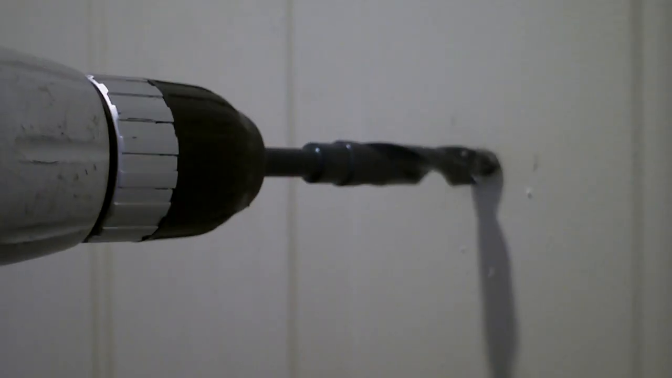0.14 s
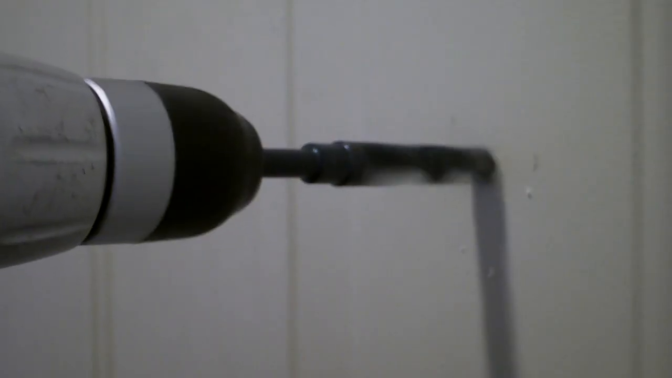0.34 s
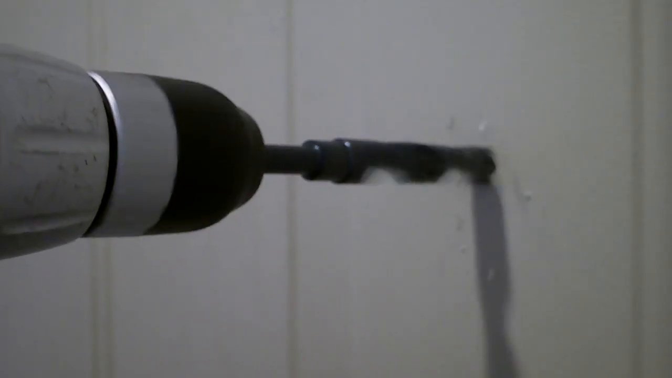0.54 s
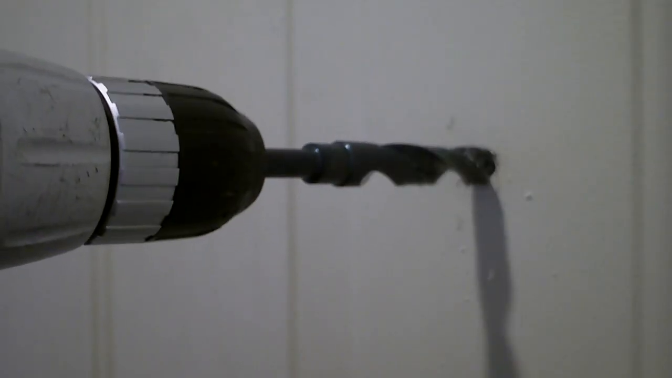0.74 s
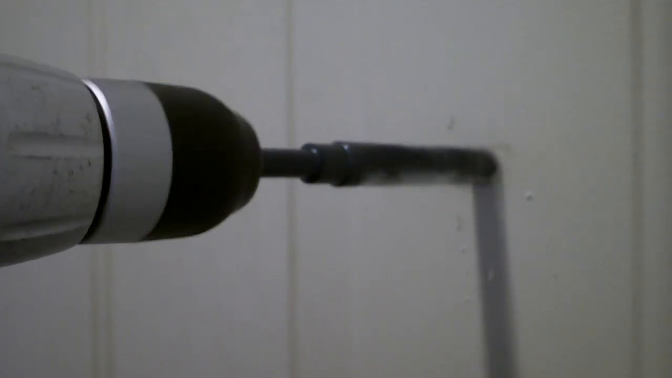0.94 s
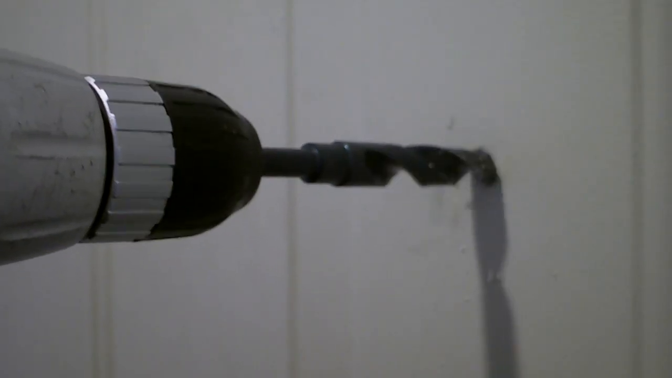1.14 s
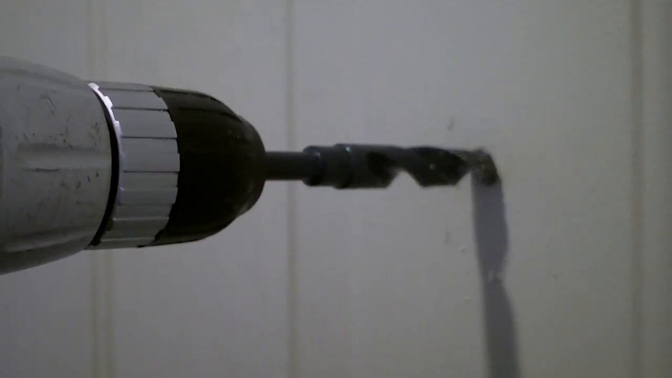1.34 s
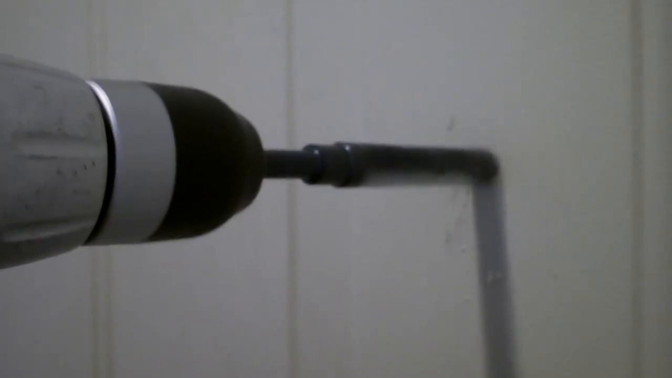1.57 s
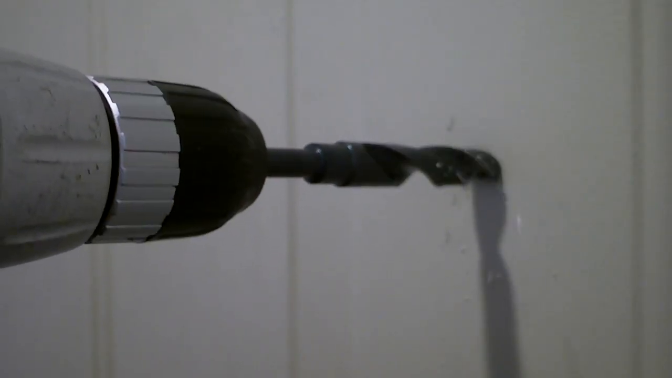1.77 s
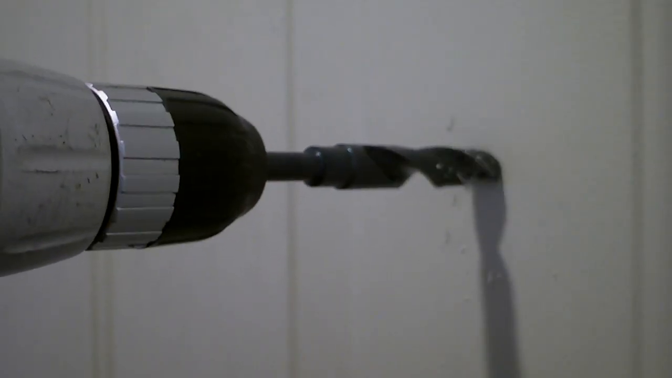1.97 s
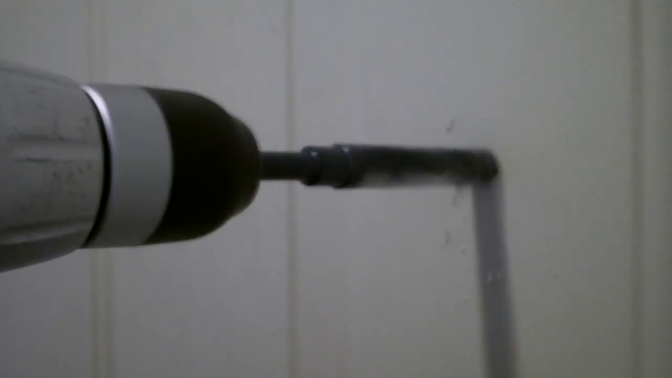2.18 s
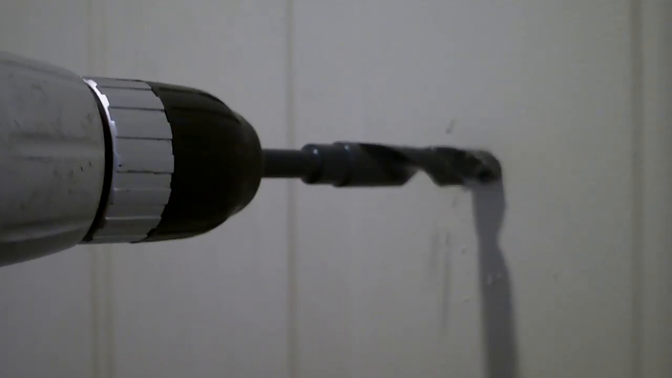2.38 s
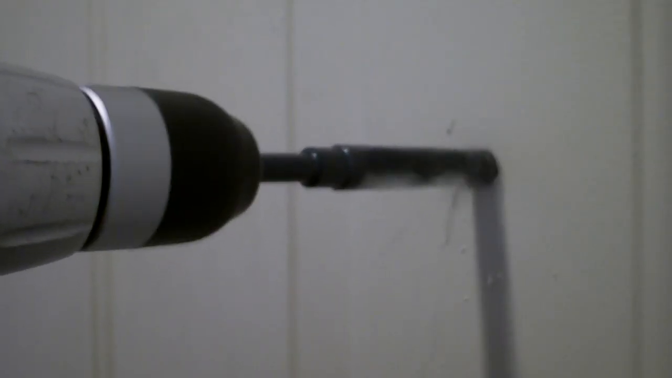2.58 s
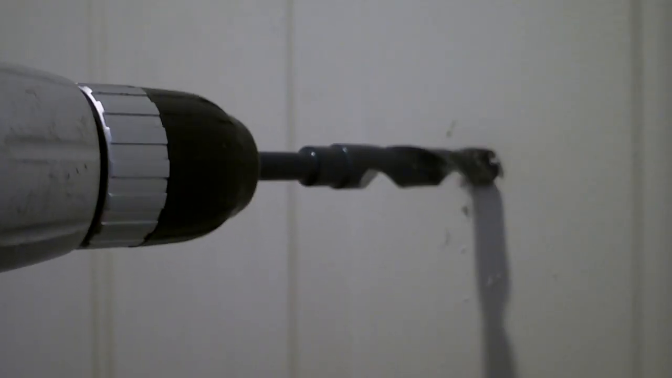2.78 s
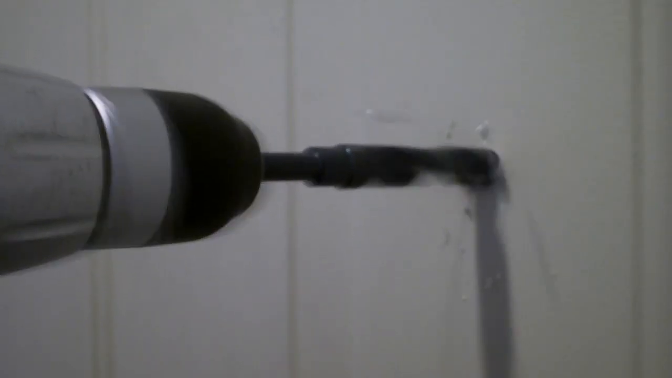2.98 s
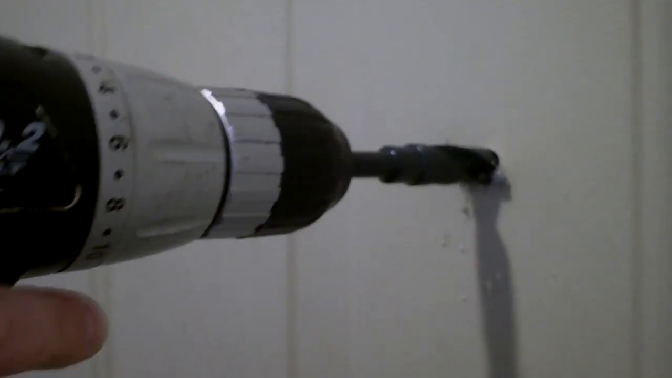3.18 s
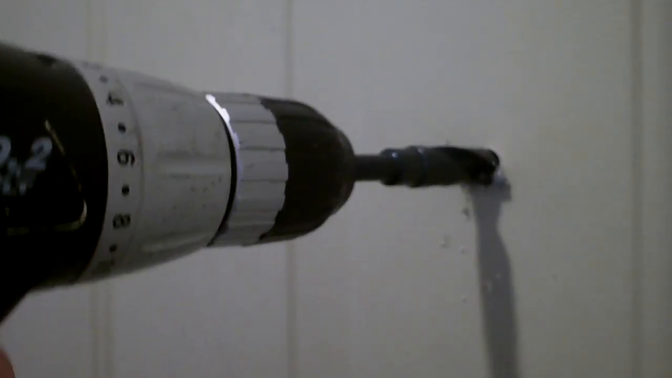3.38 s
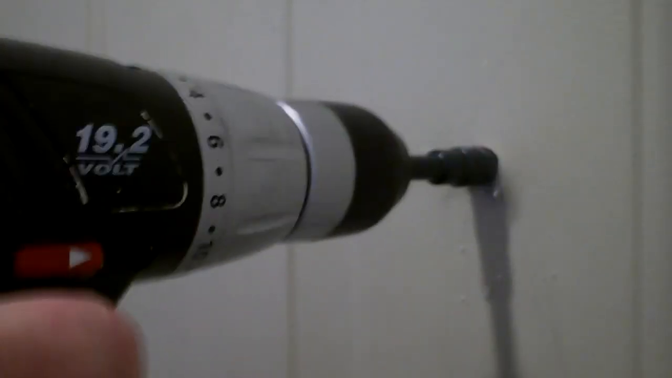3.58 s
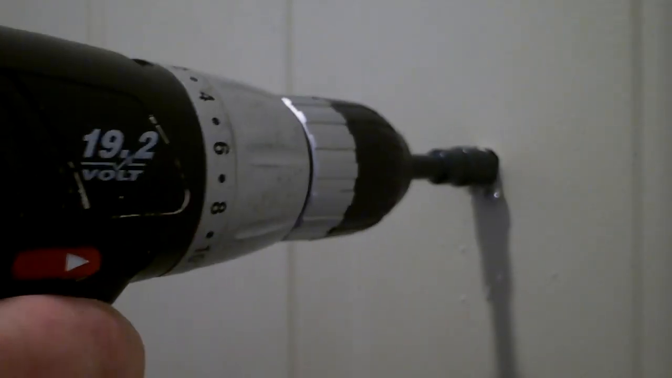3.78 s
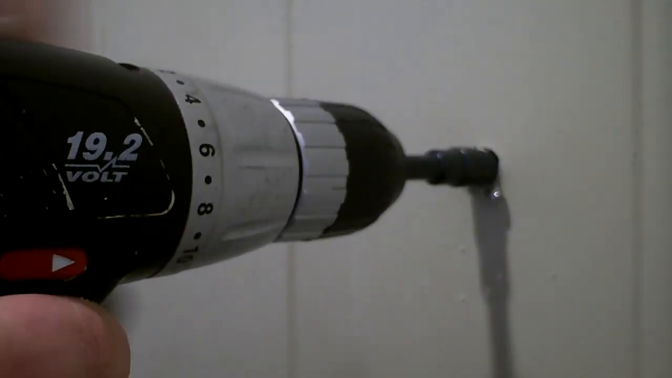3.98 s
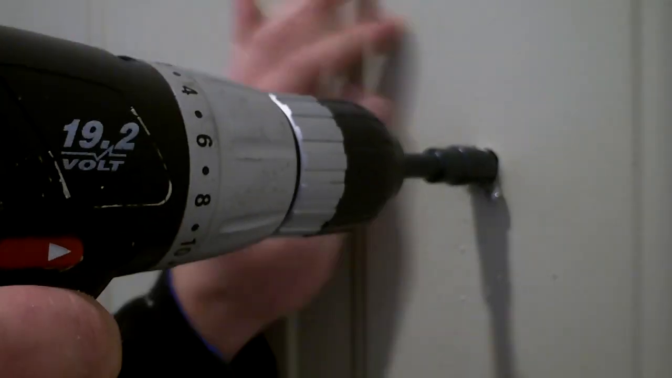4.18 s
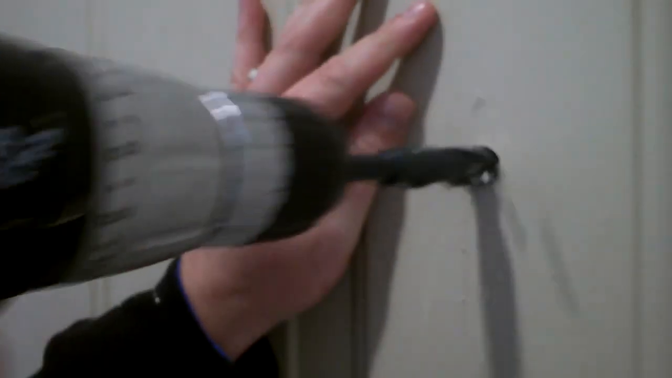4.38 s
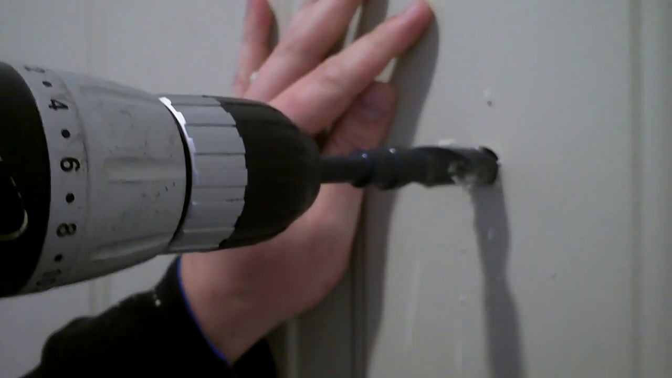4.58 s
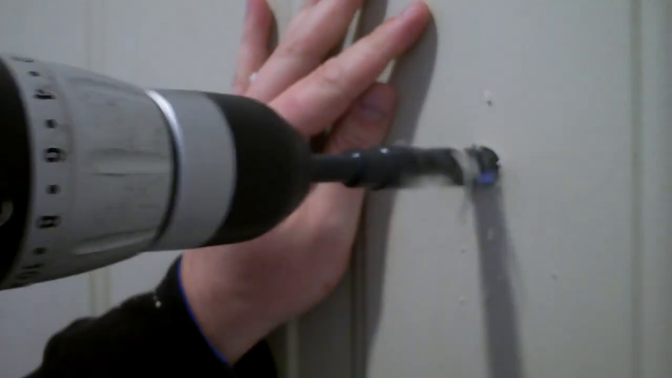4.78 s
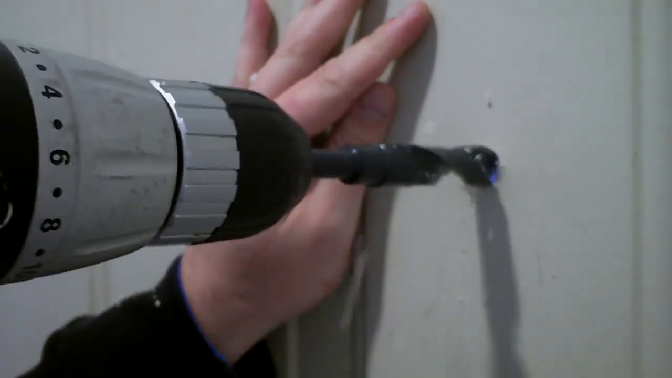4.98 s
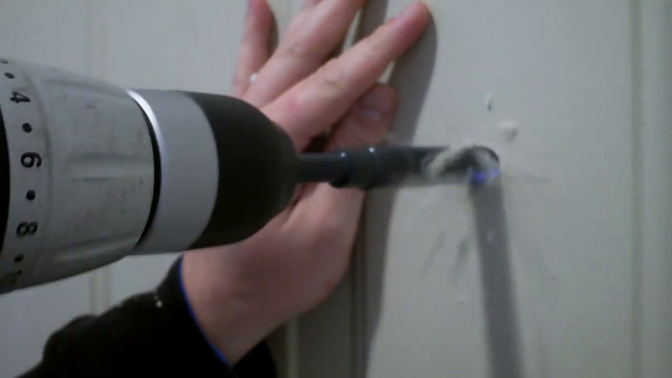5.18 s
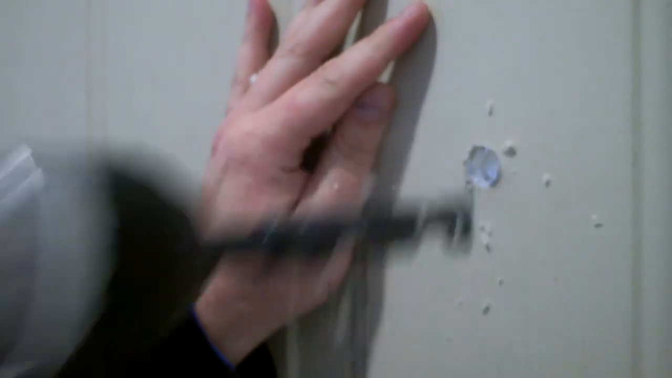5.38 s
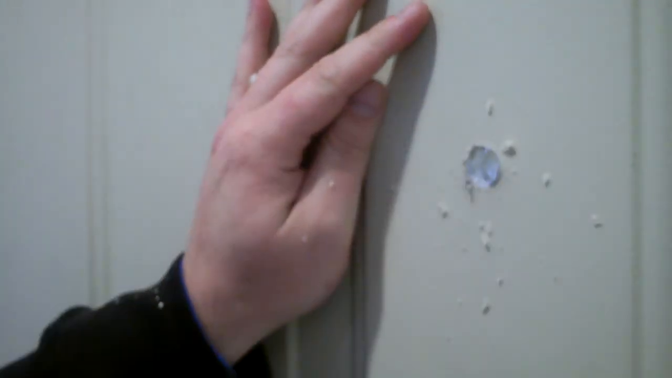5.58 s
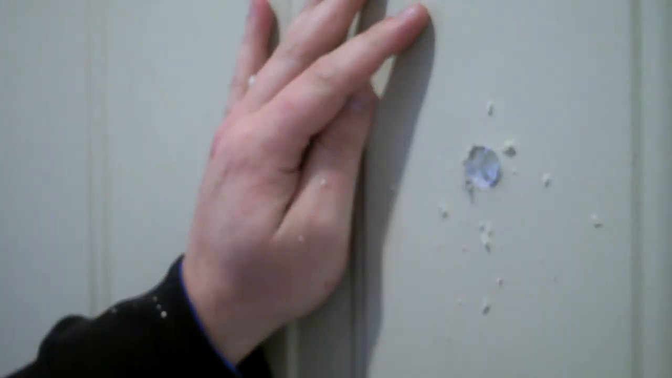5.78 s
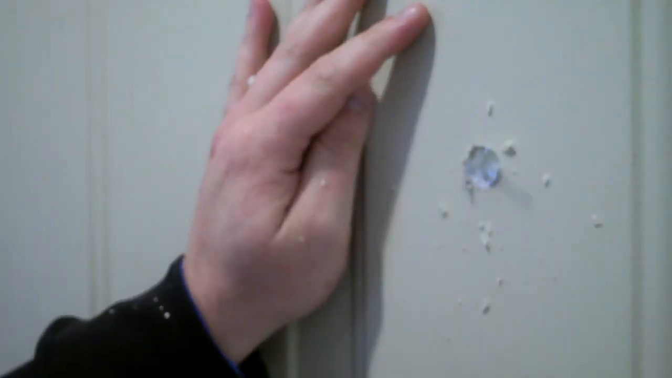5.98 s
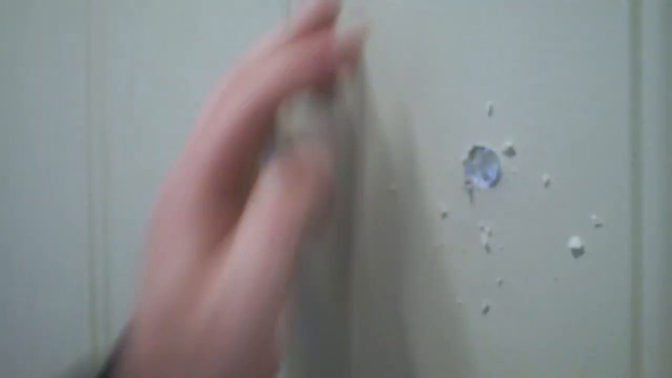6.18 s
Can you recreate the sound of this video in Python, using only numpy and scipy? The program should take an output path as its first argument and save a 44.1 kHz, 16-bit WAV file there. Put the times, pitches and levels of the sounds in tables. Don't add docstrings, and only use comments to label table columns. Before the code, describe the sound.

A cordless drill works on a thin steel door, heard very close on a small, slightly overloading microphone in a bare hallway. The end of an earlier burst dies away at 0 s. Short rasping pulls follow at about 0.3, 0.9, 1.4, 2.1, 2.5 and 2.8 s, each with gears whining up and down, dense gritty tearing, bright hiss and a hollow low boom. Trigger ticks and humming metal fill the gaps. Around 3 s the bit breaks through with brief squeals and a lurch. A heavy snagging rasp hits at 3.4-3.6 s. From 3.9 to 4.2 s there are only small ticks, soft knocks and a hand shuffling on paint. Rough, jerky bursts come at 4.2, 4.7 and 5.1 s, catching and squealing on the burr. The chuck whirs down by 5.6 s with a soft thud and ticks; near-quiet room air follows, with faint rubbing and knocks after 6 s.

```python
import sys
import numpy as np
from scipy import signal
from scipy.fft import rfft, irfft
from scipy.io import wavfile
from scipy.ndimage import uniform_filter1d

SR = 44100
rng = np.random.default_rng(int(sys.argv[2]) if len(sys.argv) > 2 else 0)


def wav_out(sig):
    wavfile.write(sys.argv[1], SR, np.round(np.clip(np.atleast_2d(sig).T, -1, 1) * 32767).astype(np.int16))


def rack_gain(trim_db):
    fader = np.asarray(trim_db, float)
    return 10 ** (fader / 20)


N = 274829
T = np.arange(N) / SR

# on_s, off_s, top_mesh_hz, whine_db (re cutting)
PULLS = [(-.3, -0.064, 2200, -7), (0.292, 0.458, 2140, -9), (0.86, 0.985, 2414, -23),
         (1.429, 1.561, 2267, -8), (2.066, 2.226, 2210, -11), (2.48, 2.621, 2250, -14),
         (2.833, 2.965, 2193, -13.5), (3.391, 3.496, 1908, -24.5), (4.229, 4.376, 1880, -9),
         (4.697, 4.834, 2113, -15.5), (5.07, 5.201, 2390, -11.5)]
# rise_s, run_on_s (after release), cut_db, scrape_db, hiss_db (both re cutting)
BITES = [(.025, 0.061, -26, -18, -18), (0.037, 0.078, -18.5, -5, -16), (0.026, .09, -18.5, -5, -16),
         (0.034, 0.087, -16.5, -5.5, -17.5), (0.033, 0.072, -17, -5.5, -18),
         (0.029, 0.096, -17.5, -5, -18.5), (0.031, 0.06, -16, -4.5, -19), (0.029, 0.077, -15, -6, -21),
         (0.01, 0.074, -24, -12.5, -30.5), (.04, 0.063, -23, -6, -18.5), (0.043, 0.049, -14, -4, -16)]
# boom_db (re cutting), sway_db, frame_jolt_db, slab_jolt_db
SHAKES = [(7, -35, -37.5, -34), (1, -34.5, -34, -36), (-2, -31, -40, -26), (-2, -31, -49, -45),
          (-1, -32.5, -44, -52), (-0.5, -30.5, -54.5, -53), (-1.5, -24.5, -33.5, -45), (0.5, -20, -39, -34),
          (-1, -27, -41.5, -38), (-7.5, -43.5, -39.5, -59), (-11, -44, -37, -55)]
# cut_db, scrape_db, hiss_db, boom_db
BITE_START = [-38, -36.5, -39.5, -30.5]
# cut_db_per_s, scrape_db_per_s, hiss_db_per_s, boom_db_per_s
STALL_RATE = [800, 547, 600, 350]
# pitch_hz, level_db
SKIN_COLOUR = [(120, -30), (200, 11), (277, -18), (315, 1.5), (429, -5), (564, -2.5), (629, -1), (922, -1),
               (1710, 0), (2250, -7), (3290, -4), (5580, -14.5), (10900, -22.5), (13900, -34),
               (15500, -71.5)]
# pitch_hz, width_hz, level_db
SKIN_MODES = [(320, 13, -0.5), (497.6, 30, 5.5), (634, 27, 0.5), (754.5, 44, -4.5), (1320, 27, -8.5),
              (1586, 44, -8.5), (1776, 19, 1.5), (2000, 56, -10.5)]
# pitch_hz, t60_s, level_db
SLAB_MODES = [
    (114.8, 0.36, 11),
    (101.7, 0.6, -2.5),
    (134, 0.14, -2),
    (212.3, 0.099, -4),
]
# peak_s, level_db, length_s, treble_db
SNAGS = [(0.384, -11, 0.019, -4), (0.416, -14, 0.029, 3), (0.467, -18, 0.042, 5), (1.61, -8.5, 0.029, -16),
         (2.118, -9, .02, -10), (2.52, -19, 0.017, -10), (2.576, -7, 0.035, -3.5), (2.864, -15, .02, -10),
         (2.949, -22, 0.028, -10.5), (3.044, -11.5, 0.067, -3.5), (3.104, -29, 0.068, -0.5),
         (3.441, 3, 0.024, -17), (3.448, -41, 0.026, -37), (3.467, 1.5, 0.027, -27),
         (3.535, -0.5, 0.077, -19), (4.25, -23, 0.024, -23), (4.28, -8.5, 0.025, -19.5),
         (4.349, -9, 0.024, -29.5), (4.385, -6, 0.03, -15.5), (4.41, -18.5, 0.029, -13),
         (4.755, -14, 0.053, -23.5), (4.801, -6, 0.051, -32), (4.871, -5, 0.034, -23.5),
         (5.121, -2.5, 0.027, -15.5), (5.161, 2, 0.035, -15), (5.191, 4.5, 0.026, -13.5),
         (5.22, 6.5, 0.051, -17)]
# start_s, level_db, pitch_hz
WHISTLES = [(0.296, -41.5, 4040), (0.8669, -37, 3870), (1.434, -38.5, 3940), (2.0737, -39.5, 3830),
            (2.486, -34.5, 4020), (2.8499, -41, 4160), (3.3947, -38.5, 4010), (5.0769, -39, 3963)]
# on_s, off_s, pitch_hz, level_db
SQUEALS = [(0, 0.047, 482, -42.5), (2.957, 2.984, 1740, -20.5), (2.99, 3.045, 10770, -44),
           (3.028, 3.064, 1512, -20), (3.033, 3.088, 1260, -24), (3.039, 3.074, 2480, -19.5),
           (3.04, 3.071, 2050, -26.5), (3.045, 3.07, 3760, -31.5), (3.429, 3.471, 336, -20),
           (3.508, 3.563, 1755, -30.5), (3.658, 3.677, 11270, -62), (4.247, 4.285, 3033, -44.5),
           (4.255, 4.337, 1680, -32.5), (4.342, 4.425, 1300, -26), (4.383, 4.428, 2570, -29),
           (4.36, 4.366, 2880, -29.5), (4.388, 4.473, 4740, -46), (4.679, 4.714, 7000, -68),
           (4.68, 4.714, 13500, -67.5), (4.708, 4.767, 4600, -50.5), (4.802, 4.828, 1810, -23.5),
           (4.822, 4.86, 3960, -35), (5.189, 5.267, 320, -21.5)]
# on_s, off_s, level_db
COASTS = [
    (3.022, 3.146, -47.5),
    (5.0, 5.11, -54),
    (5.303, 5.606, -56),
]
# pitch_hz, t60_s
STOP_HUM = [
    (211.6, 0.46),
    (110.5, 0.4),
]
# start_s, level_db, t60_s
SHOVES = [(2.98, -12.5, 0.57), (3.1, -27, 0.4), (3.43, -2, 0.34), (3.55, -25, 0.31), (3.722, -31, 1),
          (4.111, -31, 0.32), (4.28, -14.5, 0.6), (4.4, -13, 0.24), (4.749, -50.5, 2.3), (5.401, -59, 2.1),
          (6.12, -46, 0.76)]
# start_s, level_db, t60_s, body_db (re treble)
TICKS = [(0.2333, -25, 0.0077, 2), (0.2398, -30.5, 0.014, 12), (0.8195, -31, 0.026, 0),
         (0.828, -40, 0.025, 14), (0.8384, -42, 0.09, 9), (1.9864, -29, 0.017, -1),
         (1.9926, -35.5, 0.02, 14), (2.0378, -63, 0.024, 4), (3.3585, -34, 0.027, 2), (3.365, -39, 0.1, 10),
         (3.8748, -43, 0.045, 13), (3.8856, -37.5, 0.028, 17), (3.8974, -45, 0.026, 18),
         (3.906, -46.5, 0.025, 22), (4.0427, -49, 0.11, 19.5), (4.1072, -56, 0.033, 14),
         (4.2033, -38, 0.032, -5), (4.680, -54, 0.034, 7), (4.6858, -44, 0.034, 15),
         (5.6012, -38, 0.03, 10), (6.121, -53, .02, 18.5), (6.127, -48.5, 0.037, 24.5),
         (4.0365, -48, .03, 15), (5.592, -39, 0.021, 5), (5.365, -50, .04, -10), (5.455, -55, .02, -10)]
# start_s, level_db, pitch_hz
KNOCKS = [
    (4.05, -42, 95),
    (4.125, -39, 95),
    (5.456, -30, 92),
    (6.213, -37, 125),
]
# centre_s, length_s, level_db
SHUFFLES = [(4.128, 0.044, -51.5), (4.17, 0.071, -67), (4.23, 0.013, -50.5), (6.05, 0.093, -72.5),
            (6.112, .03, -65), (6.151, .035, -61.5), (6.212, 0.014, -61)]
# pitch_hz, level_db
RUB_COLOUR = [(180, -27), (300, -1), (376, -5), (494, -12), (619, -3), (940, -8.5), (1400, -6.5),
              (1850, -7.5), (14000, -33.5)]
# pitch_hz, t60_s, level_db
HALL_BANDS = [(162, 0.37, -13), (400, 0.42, -20), (990, 0.53, -22.5), (1600, 0.42, -21),
              (3160, 0.58, -20.5), (5580, 0.4, -29), (9000, .22, -36.5)]
# pitch_hz, level_db
HOUSE_COLOUR = [(15, -34.5), (25, -3.5), (81, -8), (121, -2), (160, -7), (182, -12), (218, -6),
                (1760, -23.5), (7900, -41), (11000, -42.5), (14300, -60.5), (22000, -120)]

THROUGH_S, OUT_S = 3.02, 3.9


def unit(x):
    return x / np.sqrt(np.mean(x ** 2))


def noise(count=N):
    return rng.standard_normal(count)


def band(x, lo_hz, hi_hz, order=2):
    return signal.sosfilt(signal.butter(order, [lo_hz, hi_hz], "band", fs=SR, output="sos"), x)


def colour(x, points, size=4096):
    hz, db = np.transpose(points)
    bin_hz = np.arange(size // 2 + 1) * SR / size
    level_db = np.interp(np.log(bin_hz + 1), np.log(hz), db)
    ceps = irfft(np.log(rack_gain(level_db)))
    ceps[1:size // 2] *= 2
    ceps[size // 2 + 1:] = 0
    return signal.fftconvolve(x, irfft(np.exp(rfft(ceps))))[:len(x)]


def ring(x, hz, width_hz):
    return signal.lfilter(*signal.iirpeak(hz, hz / width_hz, fs=SR), x)


def walk(rate):
    hold = int(SR / rate)
    steps = np.repeat(noise(N // hold + 1), hold)
    return unit(uniform_filter1d(uniform_filter1d(steps, hold), hold)[:N])


def burst(start_s, rise_s, t60_s):
    out, first = np.zeros(N), int(start_s * SR)
    age = T[:min(int(2 * t60_s * SR), N - first)]
    out[first:][:len(age)] = (1 - np.exp(-age / rise_s)) * 1000. ** (-age / t60_s)
    return out


def clicks(rate, spread_db):
    hits = rng.random(N) < rate / SR
    size = rack_gain(spread_db * np.minimum(rng.exponential(size=N), 3))
    return unit(hits * noise() * size)


def loads():
    sag_db_s, boom_lag_s, sway_lag_s, sway_t60_s = 50, 0.012, 0.056, 0.45
    out = np.zeros((5, N))
    for pull, bite, shake in zip(PULLS, BITES, SHAKES):
        on, off = pull[:2]
        rise_s, run_on_s, cut_db, scrape_db, hiss_db = bite
        boom_db, sway_db = shake[:2]
        age = np.clip(T - on, 0, None)
        late = np.clip(T - off - run_on_s, 0, None)
        hold_db = cut_db - sag_db_s * np.clip(T - off, 0, None)
        for k, rel_db in enumerate([0, scrape_db, hiss_db, boom_db]):
            level_db = hold_db + rel_db + BITE_START[k] * np.exp(-age / rise_s) - STALL_RATE[k] * late
            out[k] += np.minimum(age / 0.0066, 1) * rack_gain(level_db)
        out[4] += rack_gain(sway_db) * (1 - np.exp(-(age / sway_lag_s) ** 2)) * 1000. ** (-late / sway_t60_s)
    out[3] = np.interp(T - boom_lag_s, T, out[3])
    return out


def motor():
    spin_up_s, brake_s = .04, .16
    hz, whine = np.zeros(N), np.zeros(N)
    for on, off, top_hz, db in PULLS:
        spin_up = 1 - np.exp(-np.clip(T - on, 0, None) / spin_up_s)
        speed = spin_up * np.exp(-(np.clip(T - off, 0, None) / brake_s) ** 2)
        hz = np.where(T >= on, top_hz * speed, hz)
        whine = np.where(T >= on, rack_gain(db - 12.3 * speed ** 4), whine)
    return hz, whine


def chatter(rate, lo_hz, hi_hz):
    out = np.zeros(N + SR)
    for place, pitch, span, glide, size in rng.random((int(rate * N / SR), 5)):
        age = np.arange(int(SR * (0.0051 + .016 * span))) / SR
        hz = lo_hz * (hi_hz / lo_hz) ** pitch * (1 + 6 * (glide - .5) * age)
        chirp = np.hanning(len(age)) * np.sin(2 * np.pi * np.cumsum(hz) / SR)
        out[int(place * N):][:len(age)] += rack_gain(-14 * size) * chirp
    return out[:N]


def torn_chips():
    chips = colour(clicks(5000, 1.6) + 0.98 * noise(), SKIN_COLOUR)
    modes = sum(rack_gain(db + 4.4 * walk(40)) * ring(chips, hz, width) for hz, width, db in SKIN_MODES)
    return unit(chips + modes) + rack_gain(-5.0) * unit(colour(chatter(1100, 324.9, 5500), SKIN_COLOUR))


def slab_boom(shake, boom):
    slab = rack_gain(14.0) * band(shake, 88, 217)
    for hz, t60_s, db in SLAB_MODES:
        slab = slab + rack_gain(db + 19) * ring(shake, hz, 1.97 / t60_s) / np.sqrt(1.14 / t60_s)
    locked = np.sin(2 * np.pi * 110 * T + 1.3 * walk(35))
    return slab + rack_gain(-1.5 + 1.2 * walk(30)) * boom * locked


def drill(cut, scrape, hiss, boom):
    through_db, mesh_per_flute = -2.5, 80
    through = T > THROUGH_S
    cut = cut * np.where(through, rack_gain(through_db), 1)
    mesh_hz, whine = motor()
    turn = 2 * np.pi * np.cumsum(mesh_hz * (1 + 0.025 * walk(300))) / SR
    throb = rack_gain(0.67 * np.sin(turn / mesh_per_flute) + 1.1 * walk(60))
    chips = torn_chips()
    gears = rack_gain(9.6 * walk(70)) * np.sin(turn) + rack_gain(-16.5 + 8 * walk(60)) * np.sin(turn / 2)
    body = cut * (unit(band(chips, 300, 2320, order=3)) + whine * gears)
    edge = scrape * rack_gain(1.56 * walk(35)) * unit(band(chips, 2163, 4600, order=3))
    fine = unit(band(chips, 7020, 17000))
    buried = through & (T < OUT_S)
    fine = np.where(buried, band(fine, 1900, 10200, order=3), fine)
    brush = hiss * rack_gain(.7 * walk(120) + through * 2.3 * walk(40)) * fine
    slab = slab_boom(boom * throb * clicks(1500, 1.4), boom)
    earlier = rack_gain(-37.0) * 1000. ** (-T / 0.72) * unit(band(chips, 330, 3500))
    return throb * (body + edge + brush), slab + earlier


def snags():
    mid, top = np.zeros((2, N))
    for peak_s, db, length_s, treble_db in SNAGS:
        grip = np.exp(-np.abs((T - peak_s) / max(length_s, .004)) ** 3)
        rasp = rack_gain(db - 10.5) * burst(peak_s, 0.003, 0.2) * grip
        mid = mid + rasp
        top = top + rasp * rack_gain(treble_db)
    tear = colour(clicks(4000, 2.3), SKIN_COLOUR)
    bite = band(tear, 300, 2400) + rack_gain(5.5) * ring(tear, 1680, 410)
    return mid * unit(bite) + top * unit(band(tear, 2210, 14000))


def whistles_and_squeals():
    out = np.zeros(N)
    for start_s, db, hz in WHISTLES:
        out += rack_gain(db) * burst(start_s, 0.0022, 0.6) * np.sin(2 * np.pi * hz * T + 1.2 * walk(500))
    for on, off, hz, db in SQUEALS:
        age = T[:int((off - on) * SR)]
        width_hz = min(.11 * hz, 320)
        screech = ring(ring(noise(SR // 4), hz, width_hz), hz, width_hz)
        screech = unit(screech[-len(age):])
        fade = np.clip(np.minimum(age, off - on - age) / .005, 0, 1)
        out[int(on * SR):][:len(age)] += rack_gain(db) * fade * screech
    return out * rack_gain(2 * walk(200))


def coast():
    fade = sum(rack_gain(db) * burst(on, .02, 0.46) * np.clip((off - T) / .02, 0, 1) for on, off, db in COASTS)
    return fade * rack_gain(1.5 * walk(40)) * unit(band(noise(), 2500, 8500, order=1))


def stop_jolts():
    stop_lag_s, half_s = 0.066, 0.034
    out = np.zeros(N)
    for k, (hz, t60_s) in enumerate(STOP_HUM):
        jolt = np.zeros(N)
        for pull, shake in zip(PULLS, SHAKES):
            distance_s = np.abs(T - pull[1] - stop_lag_s)
            jolt += rack_gain(shake[2 + k]) * np.clip(1 - distance_s / half_s, 0, 1)
        drive = jolt * np.sin(2 * np.pi * hz * T + 0.5 * walk(25))
        out += rack_gain(16.5) * ring(drive, hz, 2.7 / t60_s)
    return out


def hinges(lean):
    rock_hz, rest_db = 24.3, -55
    lurch = sum(rack_gain(db) * burst(start_s, 0.0097, t60_s) for start_s, db, t60_s in SHOVES)
    rock = lurch * np.sin(2 * np.pi * rock_hz * T + 1.1 * walk(27))
    rumble = unit(ring(noise(), 27, 6) + .4 * ring(noise(), 50, 8))
    return rock + rack_gain(-1) * (lean + rack_gain(rest_db)) * rumble


def handling():
    low = unit(band(noise(), 500, 3200))
    high = unit(band(noise(), 3200, 11000))
    out = np.zeros(N)
    for start_s, db, t60_s, body_db in TICKS:
        out += rack_gain(db - 20.5) * burst(start_s, 0.00033, max(t60_s, .005)) * (high + rack_gain(body_db) * low)
    for start_s, db, hz in KNOCKS:
        age = np.clip(T - start_s, 0, None)
        cycles = hz * (age + .008 * (1 - np.exp(-age / .002)))
        out += rack_gain(db) * burst(start_s, .0003, .06) * np.sin(2 * np.pi * cycles)
    rub = sum(rack_gain(db) * np.exp(-((T - centre_s) / length_s) ** 2) for centre_s, length_s, db in SHUFFLES)
    return out + rub * rack_gain(0.95 * walk(72)) * unit(colour(clicks(6000, 2.8), RUB_COLOUR))


def hall(dry):
    age = T[:SR]
    tail = rack_gain(-22.5) * unit(ring(noise(SR), 1457, 340)) * 1000. ** (-age / 0.69)
    for hz, t60_s, db in HALL_BANDS:
        fall = 1000. ** (-age / t60_s) + rack_gain(-20.0) * 1000. ** (-age / (2.54 * t60_s))
        tail = tail + rack_gain(db) * unit(band(noise(SR), hz / 1.34, hz * 1.52, order=1)) * fall
    build_up = 1 - np.exp(-age / 0.0062)
    return signal.fftconvolve(dry, tail * build_up * rack_gain(-38.5))[:N]


def house():
    return rack_gain(-59.5 + 0.5 * walk(38)) * unit(colour(noise(), HOUSE_COLOUR))


def scene():
    *load, lean = loads()
    cutting, slab = drill(*load)
    close = cutting + snags() + whistles_and_squeals() + coast() + handling()
    return (close + hall(close) + slab + stop_jolts() + hinges(lean) + house())[None]


def band_limit(x):
    return signal.sosfilt(signal.butter(12, 15610, fs=SR, output="sos"), x)


def record(dry):
    top_cut = signal.sosfilt(signal.ellip(6, .5, 45, 14400, fs=SR, output="sos"), dry)
    mix = np.clip(top_cut, -1, 1)
    return band_limit(mix)


dry = scene()
out = record(dry)
wav_out(out)
```